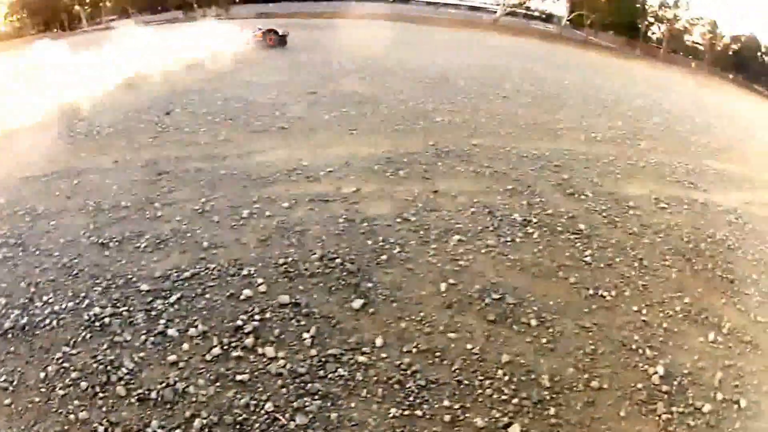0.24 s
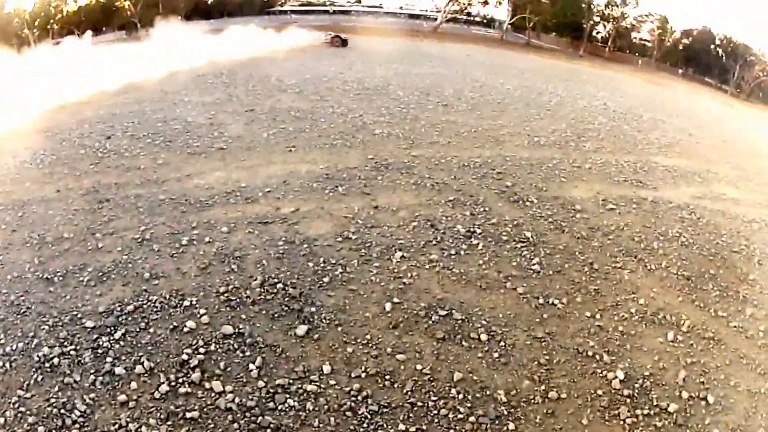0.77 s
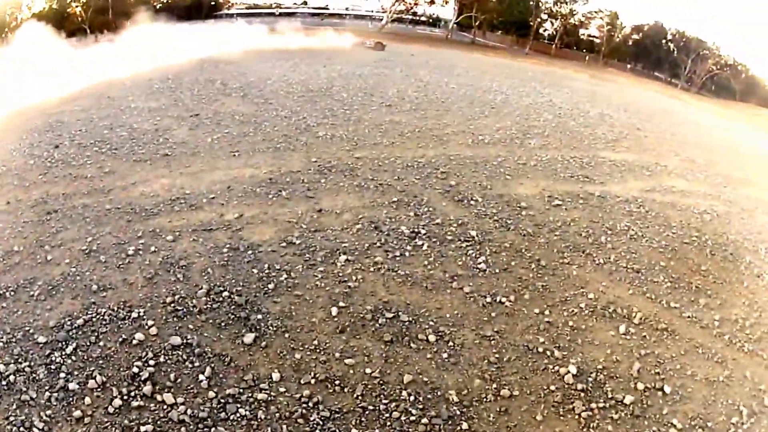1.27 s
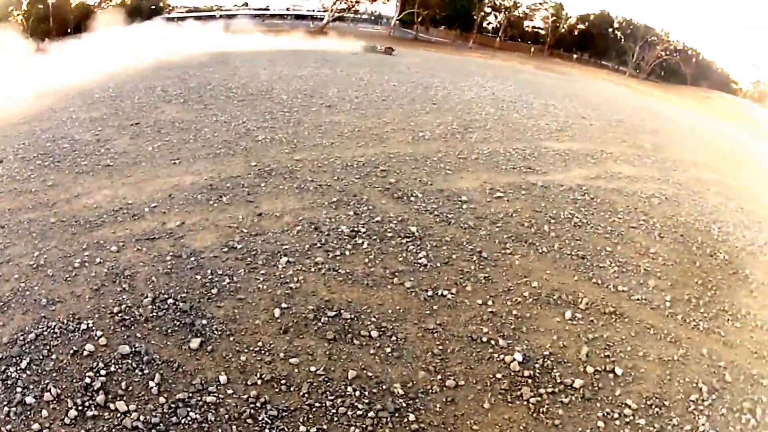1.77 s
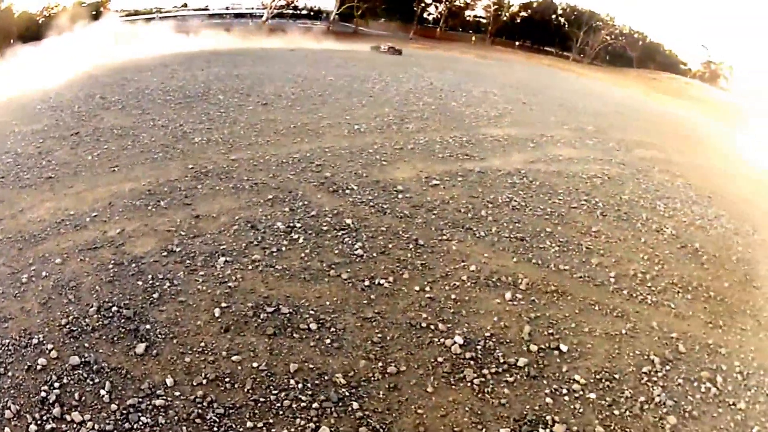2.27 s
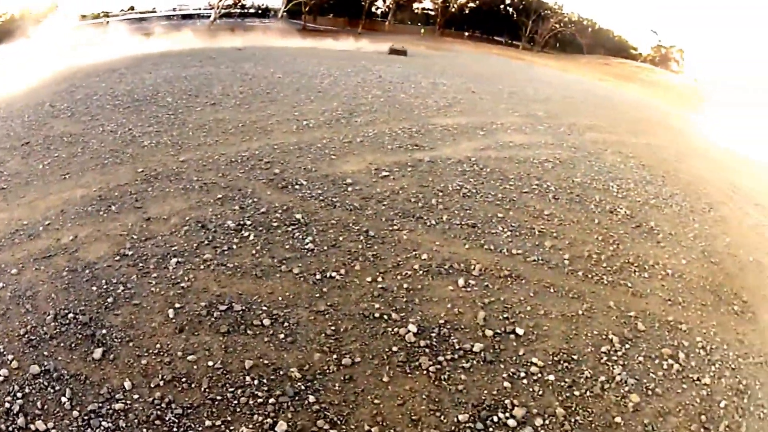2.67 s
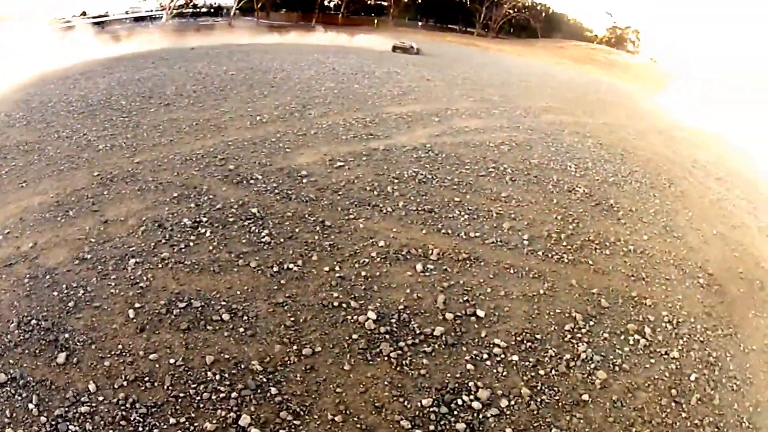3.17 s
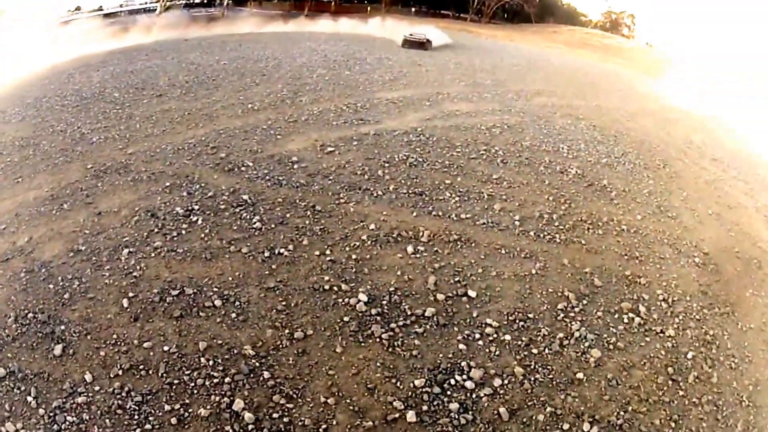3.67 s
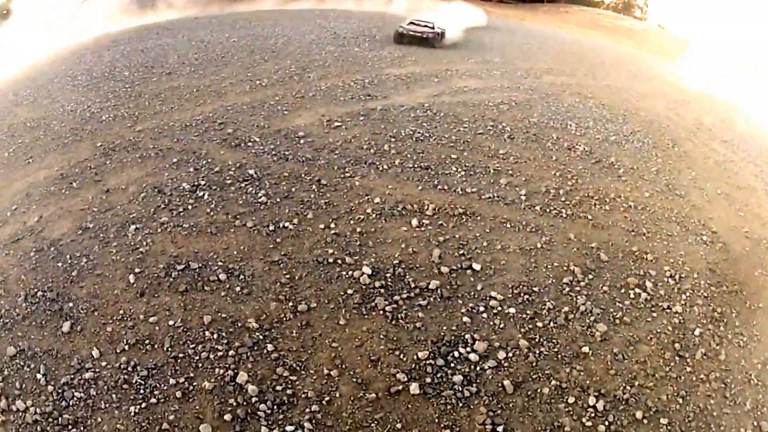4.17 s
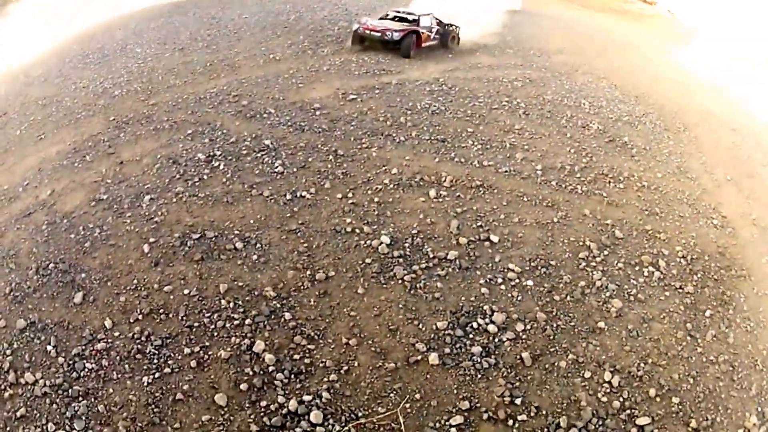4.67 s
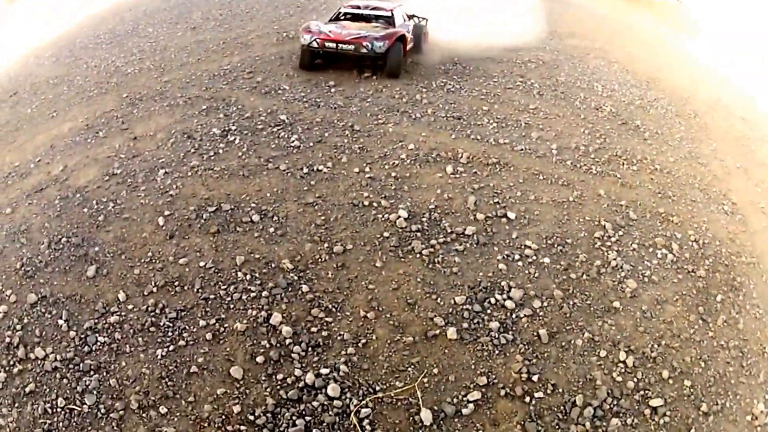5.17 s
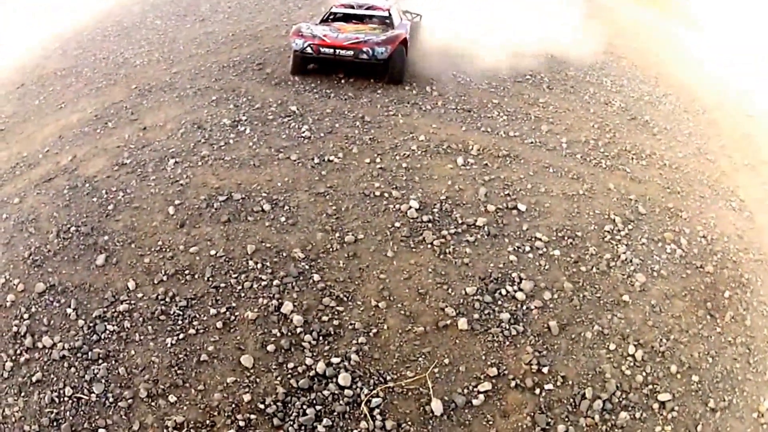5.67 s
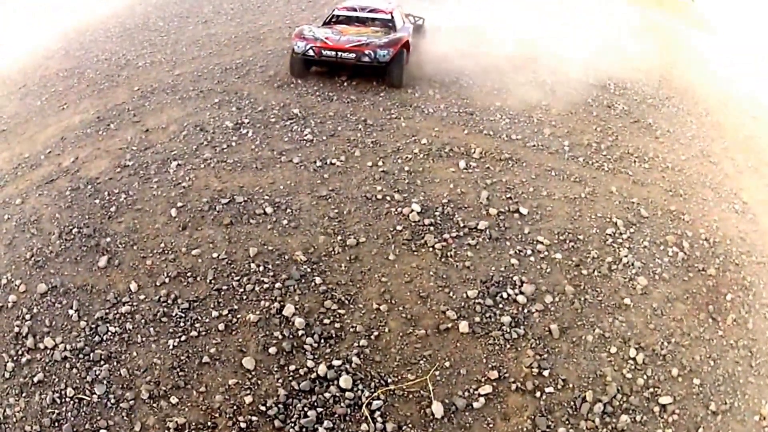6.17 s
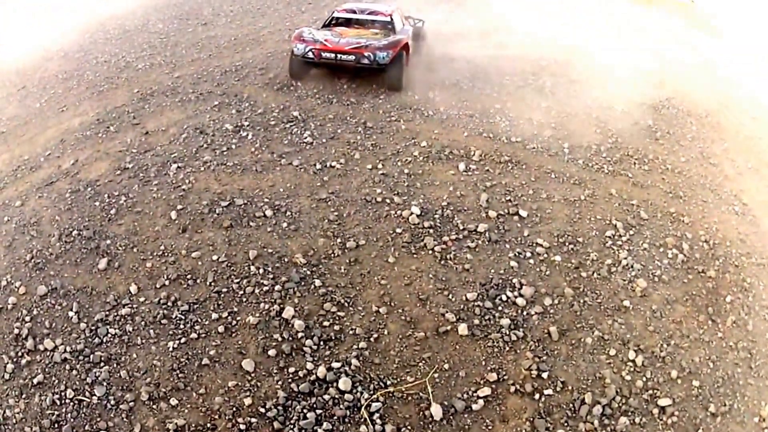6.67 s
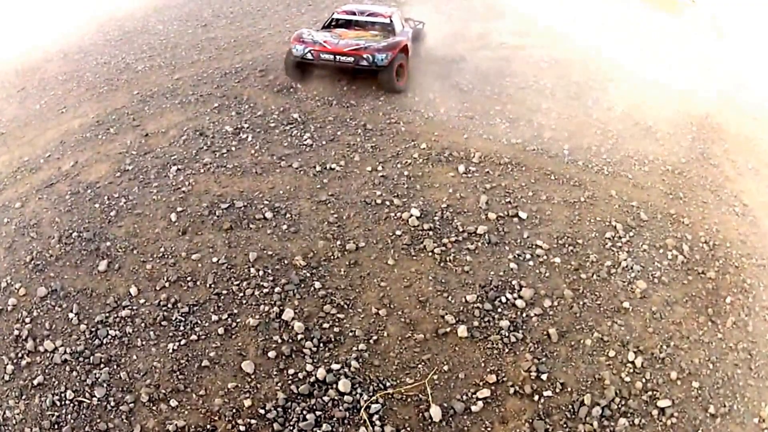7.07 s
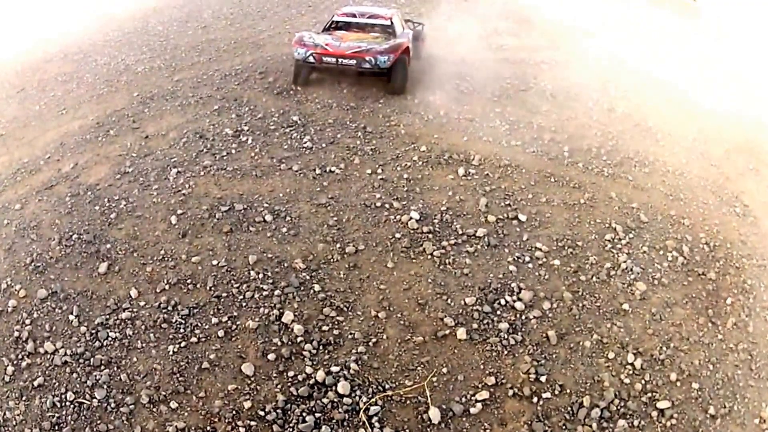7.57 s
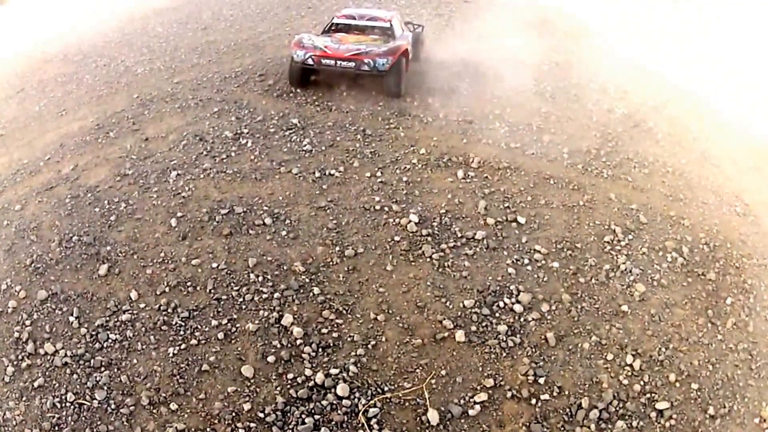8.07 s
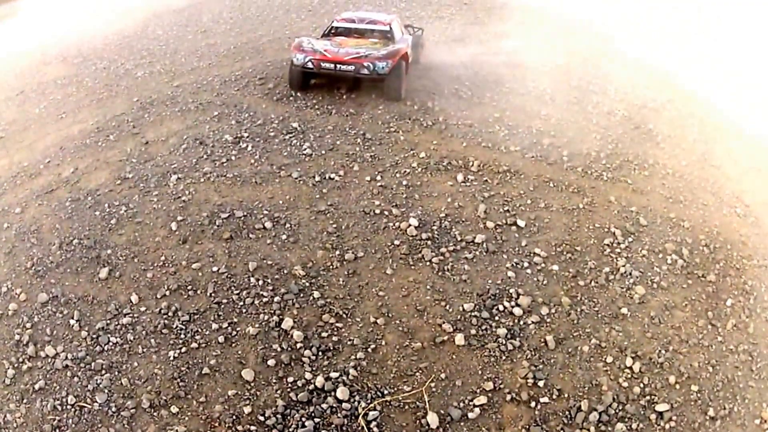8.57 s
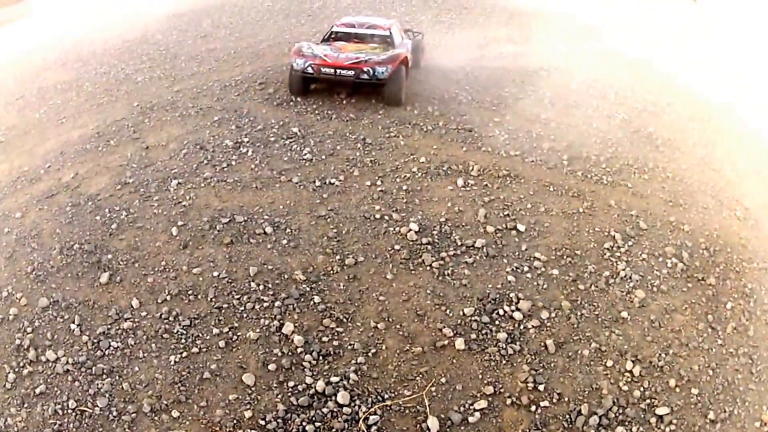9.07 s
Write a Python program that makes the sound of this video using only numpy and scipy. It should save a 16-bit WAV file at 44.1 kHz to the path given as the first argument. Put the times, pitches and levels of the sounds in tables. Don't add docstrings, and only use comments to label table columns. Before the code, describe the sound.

A radio-controlled truck with a small two-stroke engine drives off across a gravel yard with a raspy, steady buzz. It lets off and sinks into a hollow coast, then pulls again, climbing and fluttering as the wheels slip. Braking brings a falling growl and stone ticks, then an uneven popping idle close by. The boxed-in camera microphone sounds muffled, with gritty, metallic aliasing on top.

```python
import sys
import numpy as np
from scipy import signal
from scipy.fft import rfft, irfft, next_fast_len
from scipy.io import wavfile
from scipy.ndimage import uniform_filter1d, minimum_filter1d, map_coordinates

SR = 44100
rng = np.random.default_rng(int(sys.argv[2]) if len(sys.argv) > 2 else 0)


def master(y):
    cut = np.clip(np.atleast_2d(y).T, -1, 1)
    pcm = np.round(cut * 32767)
    wavfile.write(sys.argv[1], SR, pcm.astype(np.int16))


def ratio(d):
    e = np.asarray(d, float) / 20
    return 10 ** e


N = 411453
TIME = np.arange(N) / SR


def unit(x):
    return x / np.sqrt(np.mean(x ** 2) + 1e-20)


def steady(x):
    return x / np.sqrt(np.abs(uniform_filter1d(x ** 2, size=5000)) + 1e-12)


def along(points, hz):
    f, v = np.transpose(points)
    return np.interp(np.log(hz + 1), np.log(f + 1), v)


def curves(rows):
    s, *cols = np.transpose(rows)
    return [np.interp(TIME, s, c) for c in cols]


def during(rows, fade):
    inside = np.minimum(TIME - rows[0][0], rows[-1][0] - TIME)
    return np.clip(inside / fade + 1, 0, 1)


def phase(start, end, first_db, last_db):
    return [(start, first_db), (end, last_db)]


def wobble(rate, span=slice(None)):
    knots = rng.standard_normal(int(N * rate / SR) + 4)
    return map_coordinates(knots, [TIME[span] * rate])


def filtered(x, response):
    m = next_fast_len(N + 8192)
    return irfft(rfft(x, m) * response(np.fft.rfftfreq(m, 1 / SR)), m)[:N]


def coloured(spectrum):
    return unit(filtered(rng.standard_normal(N), lambda f: ratio(along(spectrum, f))))


# time_s, shaft_hz
DRIVING_SPEED = [(0, 234), (.35, 246.2), (.45, 236.6), (.5, 218.3), (.92, 234.1), (1.0, 177.2),
                 (1.15, 136.9), (1.35, 110.9), (1.64, 95.77), (1.76, 142.9), (1.82, 156.8), (2.07, 158.4),
                 (2.5, 179.1), (3.955, 187.8), (4.06, 142.8), (4.27, 111.6), (4.46, 87.82), (4.78, 75.86)]
# time_s, shaft_hz
IDLE_SPEED = [(5.0, 71.35), (5.68, 62.38), (6.21, 64.24), (7.13, 64.08), (7.32, 65.93), (7.6, 63.38),
              (7.99, 60.46), (8.63, 60.42), (9.33, 64.87)]
# time_s, shaft_change_hz
WHEEL_SLIPS = [(.14, 4), (.21, -6.5), (.34, 2), (.6, -2), (.65, 4), (.74, -4), (.915, 4), (2.27, 2),
               (2.5, 4), (2.55, -4), (2.65, 5), (2.703, 8), (2.78, -3), (2.9, 3), (3.12, 2), (3.19, 2),
               (3.25, -3), (3.38, 6.5), (3.485, -6.5), (3.56, -4), (3.65, 5.5), (3.7, -3), (3.76, -6),
               (3.9, 2)]
HARD_BURNS = [5.061, 5.157, 5.303, 5.422, 5.705, 5.802, 5.945, 6.227, 6.289, 6.429, 6.554, 6.771, 6.818,
              6.866, 7.037, 7.27, 7.331, 7.562, 7.673, 7.753, 7.882, 8.065, 8.181, 8.23, 8.411, 8.562,
              8.692, 8.905, 9.095, 9.297]
SLIP_S = 0.0303
KICK_HZ, KICK_S = 1.6, .07
FIRST_STRONG_S = 5.0272


def shaft():
    t = TIME[::64]
    slip = sum(change * np.exp(-((t - s) / SLIP_S) ** 2) for s, change in WHEEL_SLIPS)
    kick = sum(KICK_HZ * (t > s) * np.exp(-np.abs(t - s) / KICK_S) for s in HARD_BURNS)
    kick -= uniform_filter1d(kick, size=250)
    speed = curves(DRIVING_SPEED + IDLE_SPEED)[0] + np.interp(TIME, t, slip + kick)
    turns = np.cumsum(speed) / SR
    return turns - turns[round(FIRST_STRONG_S * SR)]


# shaft_hz, decay_turns
FOULING_MEMORY = [(60.8, 2.2), (62.5, 9)]


def burns(turns):
    at = np.flatnonzero(np.diff(np.floor(turns))) + 1
    chance = rng.standard_normal((len(at), 2))
    speed = np.gradient(turns)[at] * SR
    slow = np.clip((80 - speed) / 14, 0, 1)
    nearest = np.argmin(np.abs(TIME[at, None] + .003 - HARD_BURNS), axis=0)
    gaps = np.arange(len(at))[:, None] - nearest
    apart = np.min(np.abs(gaps), axis=1)
    swing = np.cos(np.pi * apart)
    settled = np.exp(-apart / along(FOULING_MEMORY, speed))
    quality = np.clip(.6 + .5 * slow * swing * settled + .1 * chance[:, 0], 0, 1)
    late = np.round(SR * 4e-5 * chance[:, 1]).astype(int)
    return np.clip(at + late, 0, N - 1), quality, apart == 0


# start_s, end_s, start_level_db, end_level_db
PULLS = [
    (0, 0.94, -0.5, -0.5),
    (1.7, 3.946, -0.5, -0.5),
]
# start_s, end_s, start_level_db, end_level_db
COASTS = [
    (0.989, 1.63, -1.5, -3.5),
    (3.99, 4.501, 4.5, 4.5),
    (4.526, 5.343, 3.5, -3),
]
# order_hz, level_db
FROM_BEHIND = [(220, -26.5), (250, -22.5), (440, -11.5), (490, -11), (660, -17.5), (735, -34.5),
               (880, -40.5), (980, -32)]
# order_hz, level_db
FROM_SIDE = [(150, -34.5), (190, -23), (315, -20), (380, -14.5), (470, -15.5), (525, -21), (600, -12.5),
             (760, -20)]
# order_hz, level_db
SINGING = [(380, -26), (480, -20.5), (560, -24), (620, -23.5), (700, -27.5), (780, -39), (900, -54),
           (1300, -52)]
# order_hz, level_db
SINGING_NEAR = [(340, -28), (420, -22), (500, -20), (570, -24.5), (640, -26), (720, -27.5), (800, -40),
                (1300, -53)]
# time_s, level_db
RATTLE = [(0, -37), (.41, -31), (1.1, -37), (1.38, -48.5), (1.58, -48.5), (2.15, -39.5), (2.49, -33),
          (3.2, -34), (3.6, -30.5), (4.05, -33.5), (4.44, -39), (4.62, -40.5), (5.6, -46), (7.4, -44),
          (9.33, -45.5)]
HOPS_RAD, HOP_HZ, HOP_FAST_S = (.17, .06), 16.2, .53


def pipe_orders(turns):
    rolling = np.clip((curves(RATTLE)[0] + 46) / 8, 0, 1)
    rolling *= sum(hop * during(phase(*row), .03) for hop, row in zip(HOPS_RAD, PULLS))
    hopping = np.sin(2 * np.pi * HOP_HZ * (TIME - HOP_FAST_S)) + .5 * wobble(40)
    angle = 2 * np.pi * turns + rolling * hopping
    flutter = .04 * wobble(50)
    speed = np.gradient(turns) * SR
    out = np.zeros(N)
    views = (FROM_BEHIND, FROM_SIDE, SINGING, SINGING_NEAR, SINGING_NEAR)
    for row, heard, lowest in zip(PULLS + COASTS, views, (1, 1, 4, 4, 5)):
        level_db = curves(phase(*row))[0]
        gain = during(phase(*row), .03) * np.sqrt(2) * ratio(level_db)
        on = gain > 0
        count = 4 if lowest == 1 else 5
        for k in range(lowest, lowest + count):
            db = along(heard, k * speed[on]) + 0.67 * wobble(45, on)
            out[on] += gain[on] * ratio(db) * np.cos(k * (angle + flutter)[on] + 0.626 * k * k)
    return out, angle, speed


# time_s, level_db, treble_db
RASP = [
    [(0, -28.5, -6), (.47, -33.5, -4), (.5, -39, 0), (.96, -35, -3.5)],
    [(1.66, -29, -21.5), (1.76, -28, -17), (2.1, -33, -17), (2.5, -25.5, -13.5), (3.41, -22, -11.5),
     (3.97, -26.5, -9.5)],
]
# frequency_hz, level_db
RASP_COLOUR = [(700, -2), (920, 5.5), (1080, -9), (1220, -5.5), (1420, -13), (1680, -15.5), (2000, -17),
               (2250, -24), (2560, -12.5), (3100, -28), (4100, -52), (4600, -19.5), (5150, -26),
               (5700, -45.5)]
ODD_DB = 4


def pipe_rasp(angle, speed):
    used = slice(0, 4 * SR + 2000)
    shake = (.012 * wobble(60) + .07 * wobble(22))[used]
    behind = TIME[used] < PULLS[0][1] + .2
    rasp = np.zeros((2, N))
    for k in range(5, 34):
        hz = k * speed[used]
        db = along(RASP_COLOUR, hz) + 3.1 * wobble(21.94, used) + ODD_DB * (k % 2) * behind
        order = ratio(db) * np.cos(k * (angle[used] + shake) + .6 * k * k)
        treble = np.clip((hz - 1400) / 200, 0, 1)
        rasp[:, used] += order * [1 - treble, treble]
    low, high = steady(rasp[0]), steady(rasp[1])
    out = np.zeros(N)
    for rows in RASP:
        level_db, treble_db = curves(rows)
        out += during(rows, 0.023) * ratio(level_db) * (low + ratio(treble_db - 1.0) * high)
    return out


def open_throttle(turns):
    orders, angle, speed = pipe_orders(turns)
    return orders + pipe_rasp(angle, speed)


# frequency_hz, density_db_per_hz
CLATTER_COLOUR = [(650, -28), (1100, -10), (1150, -19), (1210, -17.5), (1400, -7), (1890, -9.5),
                  (2250, -3.5), (2630, -12.5), (2900, -10.5), (3400, -20.5), (4420, -35), (7480, -120)]
# frequency_hz, density_db_per_hz
SIZZLE_COLOUR = [(1880, -38.5), (3200, -27), (3560, 0), (4140, -11), (4440, -4), (4710, -3), (5300, -4.5),
                 (5900, -20), (7670, -54.5), (13000, -120)]
SIZZLE_DB, SIZZLE_GROWS = -58, 1.19


def clatter_and_sizzle(at, quality):
    kicks = np.zeros(N)
    kicks[at] = (0.56 + quality) * ratio(rng.normal(0, 1.4, len(at)))
    decay = ratio(-60 * TIME[:SR // 10] / 0.062)
    puff = signal.fftconvolve(kicks, decay)[:N]
    puff /= np.abs(uniform_filter1d(puff, size=6000)) + 1e-6
    rattle_db, = curves(RATTLE)
    loaded = 8 * sum(during(rows, .03) for rows in RASP)
    clatter_db = rattle_db - loaded
    sizzle_db = SIZZLE_DB + SIZZLE_GROWS * (rattle_db + 45) - 0.13 * loaded
    clatter = unit((3.3 + puff) * ratio(0.99 * wobble(30)) * coloured(CLATTER_COLOUR))
    sizzle = unit((2.1 + puff) * ratio(1.6 * wobble(40)) * coloured(SIZZLE_COLOUR))
    return ratio(clatter_db) * clatter + ratio(sizzle_db - 0.5) * sizzle


# time_s, level_db
GRAVEL = [(0, -31.5), (1.1, -27), (1.6, -30.5), (1.8, -42.5), (2.4, -27.5), (5.0, -26.5), (5.6, -37),
          (9.33, -32.5)]
# frequency_hz, density_db_per_hz
ROAR_COLOUR = [(20, -45.5), (60, -19.5), (150, -7), (350, -6), (700, -2.5), (950, -20.5), (1300, -27.5),
               (2200, -120)]


def tyre_roar():
    roar = unit(ratio(1.0 * wobble(20)) * coloured(ROAR_COLOUR))
    return ratio(curves(GRAVEL)[0]) * roar


def pipe(waves):
    def response(f):
        total = 0
        for delay_ms, centre, width, db, polarity in waves:
            band = 1j * f * width / (centre ** 2 - f * f + 1j * f * width)
            delay = np.exp(-2j * np.pi * f * delay_ms / 1000)
            total = total + polarity * ratio(db) * band ** 3 * delay
        return total
    return response


# time_s, pop_level_db, bass_db
SHUT = [
    [(.96, -25.5, -9), (1.1, -11.5, -9.5), (1.2, -31, -7), (1.64, -22.5, -25), (1.68, -12, -5.5),
     (1.73, -16.5, -1)],
    [(3.97, -25.5, 2), (4.06, -13.5, -10.5), (4.16, -21, -31), (4.28, -22.5, -4.5), (4.46, -11, -18),
     (4.72, -14.5, -5.5), (5.3, -8, -11.5), (5.42, -15.5, -2.5), (9.32, -16, -2.5)],
]
# delay_ms, centre_hz, width_hz, level_db, polarity
FULL_BURN = [(1.274, 459, 352, 3, -0.98), (4.25, 365, 478, -1, -0.69), (3.758, 600, 96.4, 2, -1.23),
             (11.8, 564, 212, -1.5, 1), (1.56, 207, 72, -5.5, 0.64)]
# delay_ms, centre_hz, width_hz, level_db, polarity
WEAK_BURN = [(1.27, 313.3, 282, 3, 0.93), (3.483, 441, 374, -1.5, 0.83), (7.763, 510, 360, -5.5, 0.91),
             (11.98, 480, 235, -2.5, 0.98), (0.46, 200.4, 75, -8.5, 0.59)]
# delay_ms, centre_hz, width_hz, level_db, polarity
RING = [(4.055, 484, 65, -3, 0.96)]
# delay_ms, centre_hz, width_hz, level_db, polarity
CRACK = [(1.2, 920, 240, -28, -1)]
HARD_DB = 2


def shut_throttle(at, quality, hard):
    full, weak = np.zeros(N), np.zeros(N)
    size = ratio(rng.normal(0, .8, len(at)) + HARD_DB * hard)
    full[at] = size * quality
    weak[at] = size * (1 - quality)
    pops = filtered(full, pipe(FULL_BURN)) + filtered(weak, pipe(WEAK_BURN))
    pops += filtered(full + weak, pipe(RING))
    pops = filtered(pops, lambda f: 1 / np.sqrt(1 + (f / 800) ** 14))
    pops += filtered(full ** 4, pipe(CRACK))
    bass = filtered(pops, lambda f: 1 / (1 + (f / 400) ** 8))
    upper, lower = steady(pops - bass), steady(bass)
    unburnt = ratio(-8 * sum(during(phase(*row), 0.024) for row in COASTS))
    out = np.zeros(N)
    for rows in SHUT:
        level_db, bass_db = curves(rows)
        out += during(rows, 0.015) * ratio(level_db) * (unburnt * upper + ratio(bass_db) * lower)
    return out


# order, level_db
PUMPING = [(1, -37), (2, -32.5)]
# start_s, end_s, start_level_db, end_level_db
CLUTCH_GRABS = [
    (1.66, 1.76, -33, -40),
    (4.03, 4.42, -30, -41),
]


def crankcase(turns):
    pump = sum(ratio(db + 1.6 * wobble(25)) * np.cos(2 * np.pi * k * turns) for k, db in PUMPING)
    pumping = sum(during(rows, 0.051) for rows in SHUT)
    grab = sum(during(phase(*row), 0.033) * ratio(curves(phase(*row))[0]) for row in CLUTCH_GRABS)
    return pumping * pump + grab * np.cos(2 * np.pi * turns)


# start_s, peak_db, pitch_hz
STONES = [(0.992, -25.5, 1710), (1.1014, -27, 2510), (1.4086, -40, 1620), (1.573, -44, 1670),
          (2.44, -26, 1610), (2.4697, -24.5, 2560), (4.0454, -23, 2050), (4.1143, -23, 2000),
          (4.134, -20, 1701), (4.4273, -29.5, 2260), (4.4398, -22, 2260), (4.697, -31, 1560),
          (4.734, -29.5, 2190), (4.89, -34, 2070), (4.9576, -27, 2360), (5.1587, -36.5, 1524),
          (7.1258, -25.5, 2920), (7.3916, -41, 2030)]


def stones():
    out, t = np.zeros(N + 800), TIME[:800]
    for s, db, hz in STONES:
        tick = np.sin(2 * np.pi * hz * t) + 0.32 * np.sin(2 * np.pi * 4700 * t)
        onset = 1 - np.exp(-t / 0.00067)
        out[round(s * SR):][:800] += ratio(db + 6.5 - 60 * t / 0.009) * onset * tick
    return out[:N]


# time_s, pitch_hz, level_db
GEARS = [(1.8, 1546, -46.5), (2.0, 2082, -50), (2.6, 3450, -49), (3.7, 3496, -47.5), (3.96, 3580, -40.5),
         (4.05, 2840, -38), (4.15, 2190, -52), (4.3, 1980, -40)]


def gears():
    hz, db = curves(GEARS)
    rough = np.where(TIME < PULLS[1][1], .4, 1.5)
    jitter = rough * (.035 * wobble(150) + .012 * wobble(20))
    angle = 2 * np.pi * np.cumsum(hz * (1 + jitter)) / SR
    return during(GEARS, .05) * ratio(db + 3 * wobble(40)) * np.sin(angle)


def scene():
    turns = shaft()
    at, quality, hard = burns(turns)
    engine = open_throttle(turns) + shut_throttle(at, quality, hard) + crankcase(turns)
    body = clatter_and_sizzle(at, quality) + tyre_roar() + stones() + gears()
    return (engine + body)[None]


def low_pass(x):
    return signal.sosfilt(signal.butter(12, 15700, fs=SR, output="sos"), x)


HOLD_HZ = 12000


def record(dry):
    needed = np.minimum(1, .93 / (np.abs(dry[0]) + 1e-9))
    limited = dry[0] * uniform_filter1d(minimum_filter1d(needed, size=500), size=500)
    base = filtered(limited, lambda f: f < HOLD_HZ / 2)
    mirrored = base * (1 + 2 * np.cos(2 * np.pi * HOLD_HZ * TIME))
    held = filtered(mirrored, lambda f: np.sinc(f / HOLD_HZ) * (f < 15800))
    steps = filtered(base, lambda f: f / (3 * HOLD_HZ) * (f < 1500))
    folded = ratio(-10.5) * steps * 2 * np.sin(2 * np.pi * (SR - 3 * HOLD_HZ) * TIME)
    return low_pass((held + folded)[None])


dry = scene()
out = record(dry)
master(out)
```